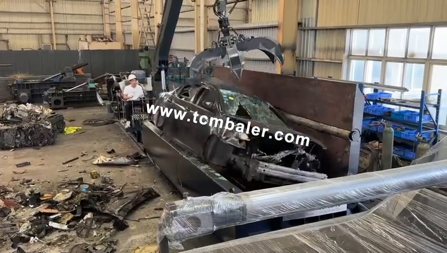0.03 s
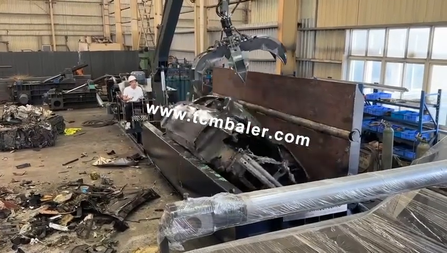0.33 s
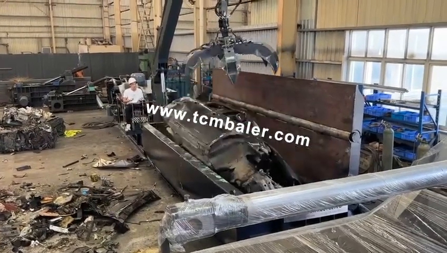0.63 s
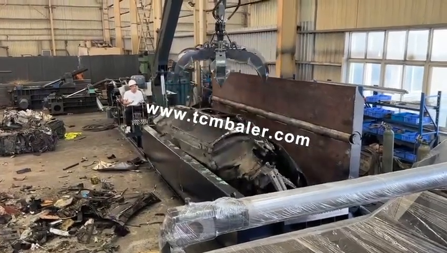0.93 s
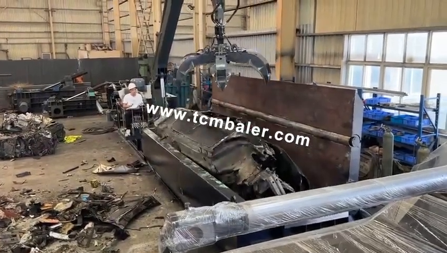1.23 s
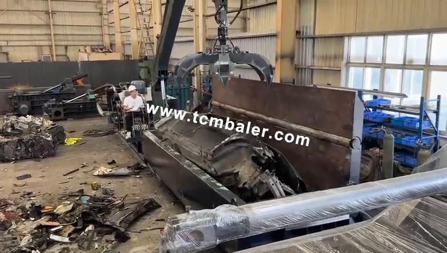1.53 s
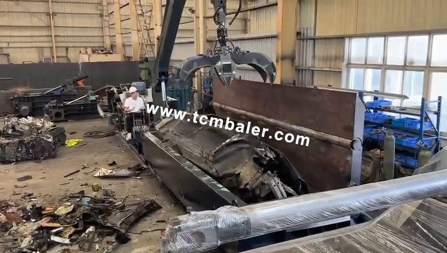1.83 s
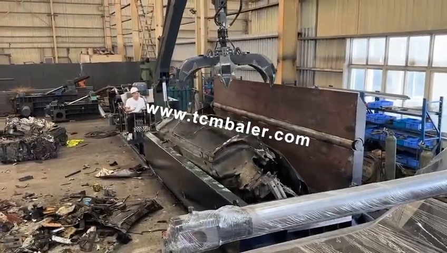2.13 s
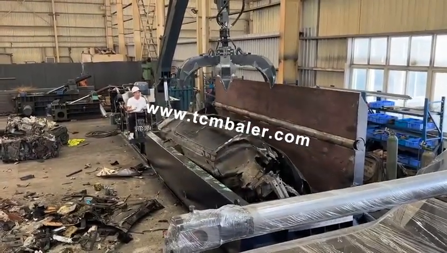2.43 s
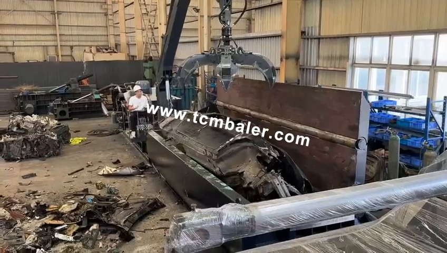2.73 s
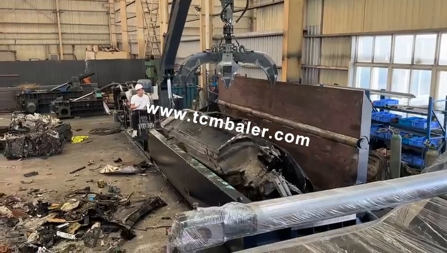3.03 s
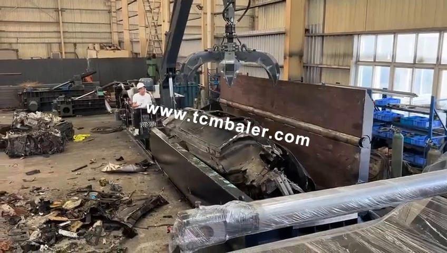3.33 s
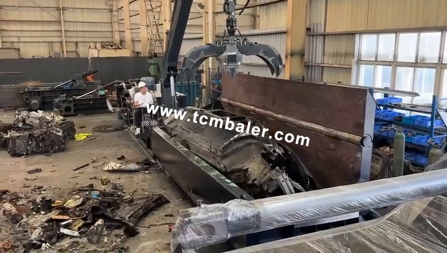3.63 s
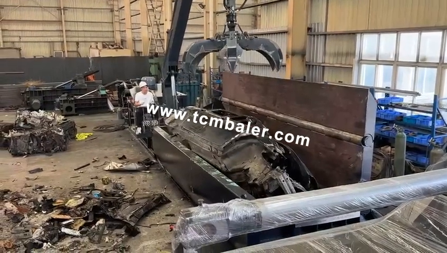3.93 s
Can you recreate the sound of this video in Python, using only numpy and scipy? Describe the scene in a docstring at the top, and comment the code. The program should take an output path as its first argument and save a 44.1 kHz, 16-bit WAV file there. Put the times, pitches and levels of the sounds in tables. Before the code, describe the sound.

A car shell scrapes out of a grab and drops into a steel press box straight ahead, crunching, booming and shedding clinking bits in a big hall. Slightly left, a hydraulic power unit throbs and whines steadily throughout.

```python
"""A car shell snaps and scrapes out of a grab, straight ahead of the microphones in a big hall.
It drops into the steel press box of a scrap baler, booms, rocks once and sheds a few clinking bits:
bursts of tiny slips and buckles ring its sheet metal, and the hall answers.
Behind it, a little to the left, the baler's power unit runs at steady speed: a throbbing engine,
a buzzing casing and a rush of air and oil, with a high whine in the middle."""
import sys
import numpy as np
from scipy import signal
from scipy.fft import rfft, irfft
from scipy.io import wavfile

SR = 44100
rng = np.random.default_rng(int(sys.argv[2]) if len(sys.argv) > 2 else 0)


def waveform_to_disk(signal):
    """Save audio, clipped to [-1, 1], as 16-bit WAV at the path in sys.argv[1]."""
    frames = np.transpose(np.atleast_2d(signal))
    scaled = np.clip(frames, -1, 1) * 32767
    samples = np.round(scaled).astype(np.int16)
    wavfile.write(sys.argv[1], SR, samples)


N = 176400
T, HZ = np.arange(N) / SR, np.fft.rfftfreq(N, 1 / SR)
CYCLE_HZ, BEAT_S = 12.498, .053  # engine cycle; time of one strong exhaust beat
WAVER_HZ = 5.6  # how fast the engine's tones waver

# How alike the hall sounds at the left and right microphones: frequency_hz, correlation
LIKENESS = [(60, .993), (170, .98), (350, .88), (700, .77), (1400, .66), (2800, .62), (5600, .5),
            (12000, .45)]
# Ringing of the car's panels: pitch_hz, width_hz, boost_db
PANEL_MODES = [(57, 25, 0.5), (213, 25, 1.5), (232, 12, 5), (308.8, 14, 10), (477, 38, 8), (710, 137, 5),
               (842, 59, 6), (1333, 79, 4.5)]


def scrapes():
    """Sheet metal catches and cracks through the claws, and its scraped edge squeals."""
    catches = [(0, 0.025, -3), (.056, 0.014, -1.5), (.076, 0.012, -0.5), (.086, 0.0044, -0.5),
               (.092, 0.0038, 5), (.105, 0.0078, 0), (.113, 0.01, 3), (.128, 0.0079, -0.5),
               (.141, 0.0087, 2.5), (.157, 0.0027, 2), (.164, 0.017, -4)]  # start_s, length_s, level_db
    colour = [(40, -46), (100, -49), (250, -52), (750, -46.5), (1050, -65), (1500, -51), (2800, -58),
              (3700, -62.5), (5400, -59), (6800, -70), (9000, -59.5), (10200, -62.5), (11500, -68),
              (15500, -78)]  # scrape spectrum: frequency_hz, gain_db
    edge_modes = [(447, 24, 4.5), (1270, 155, 15), (1440, 92, 1), (3800, 220, 9), (7870, 220, 6.5),
                  (8360, 170, -16), (10000, 530, 3.5)]  # ringing of the edge: pitch_hz, width_hz, boost_db
    return blows(catches, colour, edge_modes, fall_s=0.0085, hall_db=-12.5, grain_db=3.5)


def crunches():
    """Panels crumple against the press box."""
    buckles = [(.02, 0.026, -3), (.047, 0.0047, -5.5), (.18, 0.1, -10.5), (.285, 0.068, -5),
               (.36, 0.022, -6.5), (.43, 0.018, -4.5), (.46, 0.025, 3), (.503, 0.031, -2),
               (.558, 0.054, -5.5), (.685, 0.048, -9.5), (.756, 0.021, -5.5), (.85, 0.089, -10),
               (.905, 0.055, -9), (1.035, 0.053, -10), (1.12, 0.038, -12.5)]  # start_s, length_s, level_db
    colour = [(100, -67.5), (300, -51), (530, -49.5), (800, -51), (1500, -53.5), (2500, -56.5),
              (5000, -72.5), (7000, -71), (11000, -74), (15500, -98)]  # crunch spectrum: frequency_hz, gain_db
    return blows(buckles, colour, PANEL_MODES, fall_s=0.017, hall_db=-3, grain_db=2.5)


def booms():
    """The hollow shell booms as it is knocked about."""
    knocks = [(0, 0.043, -7.5), (.075, 0.04, -4.5), (.2, 0.06, -9), (.36, 0.037, 0), (.44, 0.049, 0.5),
              (.5, 0.044, -0.5), (.562, 0.032, -5.5), (.69, 0.041, -15), (.85, 0.033, -7),
              (.905, 0.047, -4), (.98, 0.022, -7)]  # start_s, length_s, level_db
    colour = [(15, -81), (35, -61), (55, -37), (100, -46), (160, -41), (240, -44.5), (330, -46.5),
              (500, -54.5), (1200, -84), (4000, -100)]  # boom spectrum: frequency_hz, gain_db
    return blows(knocks, colour, PANEL_MODES, fall_s=0.016, hall_db=-10.5, grain_db=2)


def thuds():
    """Landing and rocking back swing the whole shell, or one panel, through a few cycles."""
    landings = [(0.381, 300, -13), (0.414, 54.4, -16), (.474, 217, -13), (.517, 74, -17), (.86, 460, -20),
                (.915, 56, -23), (.914, 290, -14.5), (.97, 67, -18.5)]  # start_s, pitch_hz, level_db
    colour = [(20, -7), (60, 0), (500, 0.5), (2000, -15)]  # response of the shell: frequency_hz, gain_db
    rise_cycles, hall_db = 0.97, -20
    push = np.zeros((1, N))
    for start_s, pitch_hz, level_db in landings:
        cycles = np.maximum(T - start_s, 0) * pitch_hz
        swell = np.minimum(cycles / rise_cycles, 50)
        push += amp(level_db) * swell * np.exp(1 - swell) * np.sin(2 * np.pi * cycles)
    echo = irfft(spread(rfft(hall(push)), read(LIKENESS, HZ)), N)
    return irfft(ringing(push + amp(hall_db) * echo, colour, PANEL_MODES), N)


def clinks():
    """Bits of metal snap, each with its own share of hard crack and thin bright ping."""
    snaps = [(.003, .002, -14, -6), (.0195, 0.0025, -6, 7.5), (0.028, 0.0091, 1, 2),
             (.046, 0.0033, 9, 12.5), (0.076, 0.0015, 8, 10), (0.111, 0.0018, 5, -1), (0.1223, .002, 9, -3),
             (0.46, 0.02, 2, -9), (.515, 0.048, -6, -11), (0.75, 0.018, 1, -25), (0.787, .025, -14, -25),
             (1.038, 0.0045, 3, 2), (1.043, .004, -7, -6), (1.055, 0.0072, -2.5, -6),
             (1.118, .025, -14, -12)]  # start_s, length_s, crack_db, ping_db
    crack_colour = [(300, -79), (2000, -70), (4200, -61), (5500, -63.5), (6800, -78.5), (10000, -88),
                    (15500, -93)]  # crack spectrum: frequency_hz, gain_db
    ping_colour = [(300, -100), (5000, -87), (8000, -68), (10000, -61), (12000, -69), (15500, -73)]  # ping spectrum: frequency_hz, gain_db
    cracks = [(start_s, length_s, db) for start_s, length_s, db, _ in snaps]
    pings = [(start_s, length_s, db) for start_s, length_s, _, db in snaps]
    return (blows(cracks, crack_colour, [], fall_s=0.0043, hall_db=-3.5, grain_db=2)
            + blows(pings, ping_colour, [], fall_s=0.002, hall_db=-18, grain_db=-2.5))


def blows(contacts, colour, modes, fall_s, hall_db, grain_db):
    """Each contact is a burst of tiny slips and buckles that ring the metal and the hall."""
    power = 0
    for start_s, length_s, level_db in contacts:
        attack = np.clip((T - start_s) / (.25 * length_s), 0, 1)
        fall = np.exp(-np.maximum(T - start_s - length_s, 0) / fall_s)
        power += (amp(level_db) * attack * fall) ** 2
    noise = rng.standard_normal((2, N))
    grain = amp(grain_db * np.minimum(drift(280), 2))
    slips = unit_rms(noise * grain) * np.sqrt(power)
    spectrum = ringing(slips + amp(hall_db) * hall(slips), colour, modes) * np.sqrt(SR / 2)
    likeness = read(LIKENESS, HZ) ** (1 / 0.82)  # a little wider than the power unit
    return irfft(spread(spectrum, likeness), N) * pan(0.4)


def ringing(force, colour, modes):
    """Sheet metal colours a force and rings on at its modes; gives a spectrum."""
    modes_db = sum(db / (1 + (2 * (HZ - hz) / width_hz) ** 2) for hz, width_hz, db in modes)
    body_db = read(colour, HZ) + modes_db
    mirrored_db = np.r_[body_db, body_db[-2:0:-1]]
    minimum_phase = -signal.hilbert(np.log(amp(mirrored_db))).imag[:len(HZ)]
    return rfft(force) * amp(body_db) * np.exp(1j * minimum_phase)


def exhaust():
    """Low multiples of the engine cycle line up into uneven beats beside a fan's hum; gives a spectrum."""
    throb = [(6, -29.5), (9, -27), (10, -34), (11, -45), (12, -34), (14, -81), (15, -46), (18, -39.5),
             (21, -115), (24, -41), (27, -51.5), (30, -44)]  # exhaust tones: cycle_multiple, level_db
    fan_hz, fan_db, waver = 193, -40, 0.15
    fan_phase = 2 * np.pi * fan_hz * T + .5 * drift(2.3)
    tones = amp(fan_db) * np.sin(fan_phase) * (1 + waver * drift(5.7))
    for multiple, level_db in throb:
        phase = 2 * np.pi * round(multiple) * CYCLE_HZ * (T - BEAT_S)
        tones += amp(level_db) * (np.sin(phase) + waver * drift(WAVER_HZ) * np.cos(phase + np.pi / 4))
    return rfft(np.sqrt(2) * tones) * np.ones((2, 1))


def casing():
    """Higher multiples ring in the casing and waver on their way through the hall; gives a spectrum."""
    strong_tones = [(16, -43), (22, -44.0), (29, -45.8), (32, -44.6), (35, -43.9), (36, -40.3), (46, -43.1),
                    (49, -48.0), (52, -46.6), (54, -44.9), (58, -42.4), (61, -45.0), (69, -49), (70, -46.0),
                    (82, -49.7), (84, -42.3), (87, -47.4), (89, -49.7), (97, -48.5), (103, -46.7),
                    (104, -48.9), (105, -52), (108, -53.5), (126, -53), (135, -53.5), (139, -48.7),
                    (142, -50.4), (146, -54.5), (149, -53), (153, -53.5), (191, -49.8), (193, -54),
                    (277, -61)]  # casing and pump: cycle_multiple, relative_db
    buzz = [(150, -51), (330, -49), (440, -50), (520, -55.5), (850, -54), (1300, -55.5), (1600, -58.5),
            (1950, -58.5), (2150, -62), (2450, -59.5), (2700, -71), (4000, -73)]  # all the weaker multiples: frequency_hz, level_db
    strong_lift_db, waver = 1.4, 0.11
    multiples = np.arange(13, 320)
    level_db = read(buzz, multiples * CYCLE_HZ)
    for multiple, relative_db in strong_tones:
        level_db[multiples == round(multiple)] = relative_db + strong_lift_db
    bins = np.round(multiples * CYCLE_HZ * N / SR).astype(int)
    tones = np.zeros((2, len(HZ)), complex)
    tones[:, bins] = amp(level_db) * np.exp(2j * np.pi * rng.random((2, len(bins))))
    # a narrow skirt of noise around each tone makes it waver
    skirt = np.exp(-(np.arange(-40, 41) * SR / N / WAVER_HZ) ** 2)
    halo = np.sqrt(np.convolve(abs(tones[0]) ** 2, skirt / skirt.sum(), "same"))
    tones += waver * halo * unit_rms(rfft(rng.standard_normal((2, N))))
    return spread(tones, read(LIKENESS, HZ)) * N / np.sqrt(2)


def rush():
    """Air and oil noise pulses with the firing and flickers slightly band by band; gives a spectrum."""
    colour = [(15, -76), (32, -75), (45, -61), (60, -53), (100, -57), (170, -54.5), (300, -60),
              (550, -64.5), (800, -61.5), (1300, -66), (2200, -67.5), (3000, -72.5), (5000, -75),
              (6500, -74.5), (8400, -75.5), (10500, -85.5), (13000, -81.5), (15500, -95.5)]  # noise spectrum: frequency_hz, density_db
    firing_hz, pulse_depth, flicker_db = 6 * CYCLE_HZ, 0.067, 0.93
    pulse = 1 + pulse_depth * np.cos(2 * np.pi * firing_hz * (T - BEAT_S))
    noise = rfft(rng.standard_normal((2, N)) * pulse)
    edges_hz = np.r_[0, np.geomspace(200, SR / 2, 8)]
    flow = 0
    for low, high in zip(edges_hz, edges_hz[1:]):
        band = irfft(noise * (HZ >= low) * (HZ < high), N)
        flow += band * amp(flicker_db * drift(13.4))
    return spread(rfft(unit_rms(flow)), read(LIKENESS, HZ)) * amp(read(colour, HZ)) * np.sqrt(SR / 2)


def whine():
    """Narrow bands of hiss from the power unit flutter in level."""
    bands = [(8855, 240, -37.3), (8805, 10, -44), (7730, 300, -50), (8600, 600, -46.5), (9300, 500, -52)]  # pitch_hz, width_hz, level_db
    flutter_db = 1.63
    hiss = 0
    for pitch_hz, width_hz, level_db in bands:
        passband = 1 / np.sqrt(1 + (2 * (HZ - pitch_hz) / width_hz) ** 8)
        noise = spread(rfft(rng.standard_normal((2, N))), likeness=0.83)
        hiss += amp(level_db) * unit_rms(irfft(noise * passband, N))
    return hiss * amp(flutter_db * drift(46))


def hall(sound):
    """The hall returns a diffuse tail whose top treble dies first."""
    decay = [(60, 6.4), (500, 1.17), (2000, 1), (6000, 2.2), (14000, 0.14)]  # reverberation time: frequency_hz, t60_s
    hz, t, noise = signal.stft(rng.standard_normal((2, SR)), SR, nperseg=256)
    fall = amp(-60 * t / read(decay, hz)[:, None])
    build_up = np.minimum(t / 0.021, 1)
    tail = signal.istft(noise * fall * build_up, SR, nperseg=256)[1]
    tail /= np.sqrt(np.mean(np.sum(tail ** 2, 1)))
    return signal.fftconvolve(sound, tail, axes=1)[:, :N]


def amp(db):
    """Decibels to gain."""
    return 10 ** (np.asarray(db) / 20)


def unit_rms(x):
    """Scales to rms 1."""
    return x / np.sqrt(np.mean(abs(x) ** 2) + 1e-20)


def read(points, hz):
    """Reads a table on a log-frequency axis."""
    points_hz, values = np.transpose(points)
    return np.interp(np.log(hz + 1), np.log(points_hz + 1), values)


def drift(rate_hz):
    """A smooth random wander of rms 1."""
    lowpass = np.exp(-(HZ / rate_hz) ** 2) * (HZ > 0)
    return unit_rms(irfft(rfft(rng.standard_normal(N)) * lowpass, N))


def spread(pair, likeness):
    """Two unrelated spectra become left and right with the given likeness."""
    likeness = np.clip(likeness, -1, 1)
    mid = pair[0] * np.sqrt((1 + likeness) / 2)
    side = pair[1] * np.sqrt((1 - likeness) / 2)
    return np.array([mid + side, mid - side])


def pan(left_minus_right_db):
    """Left and right gains for a level difference."""
    return amp(np.array([[.5], [-.5]]) * left_minus_right_db)


def scene():
    """From the microphones: the car shell ahead, the power unit a little to the left."""
    balance = [(40, 1), (170, 2), (350, 5), (700, 1), (1400, 3), (2800, 3.5), (5000, 8), (8800, 1.5),
               (14000, 0)]  # the unit's lean to the left: frequency_hz, left_minus_right_db
    machinery = (exhaust() + casing() + rush()) * pan(read(balance, HZ))
    power_unit = irfft(machinery, N) + whine()
    car_shell = scrapes() + crunches() + booms() + thuds() + clinks()
    return car_shell + power_unit


def record(dry):
    """The recorder rounds off the highest peaks and limits the band."""
    knee, headroom, cutoff_hz = .55, .3, 15700
    excess = np.maximum(abs(dry) - knee, 0)
    rounded = dry - np.sign(dry) * (excess - headroom * np.tanh(excess / headroom))
    lowpass = signal.firwin(511, cutoff_hz, window=("kaiser", 9), fs=SR)
    return signal.oaconvolve(rounded, lowpass[None], "same")


dry = scene()
out = record(dry)
waveform_to_disk(out)
```